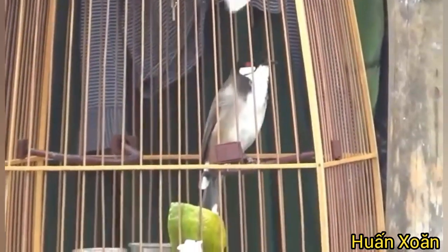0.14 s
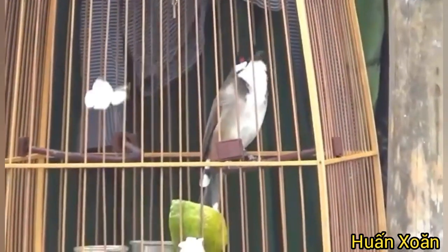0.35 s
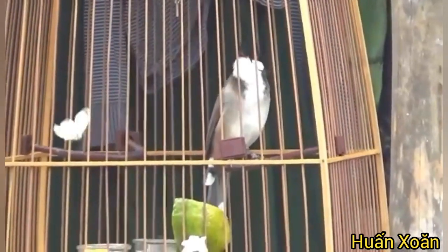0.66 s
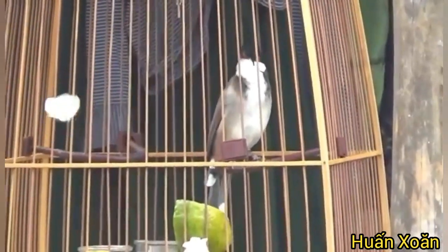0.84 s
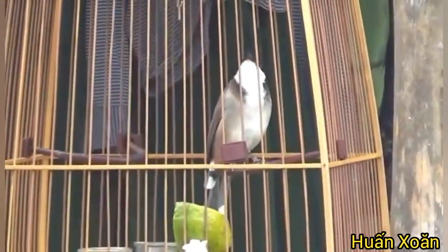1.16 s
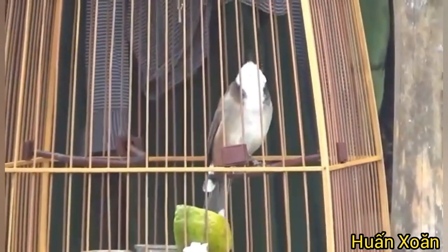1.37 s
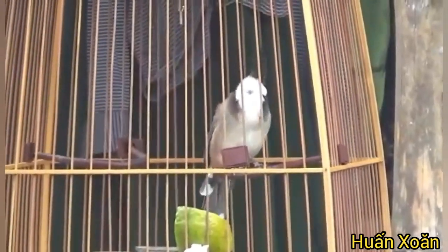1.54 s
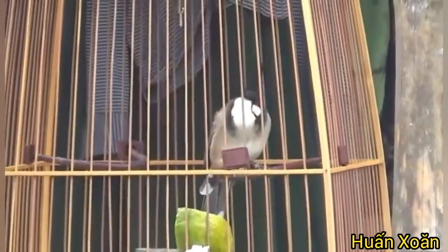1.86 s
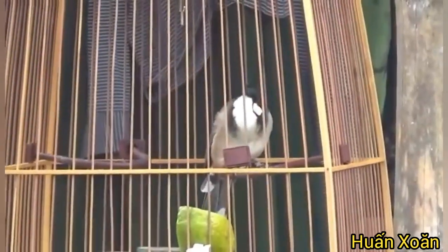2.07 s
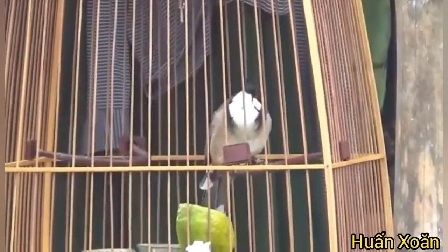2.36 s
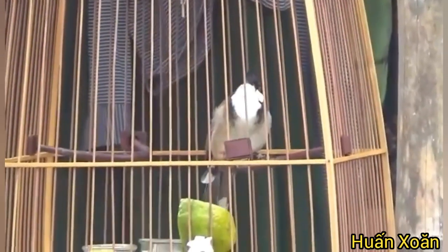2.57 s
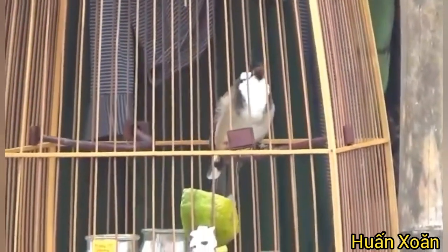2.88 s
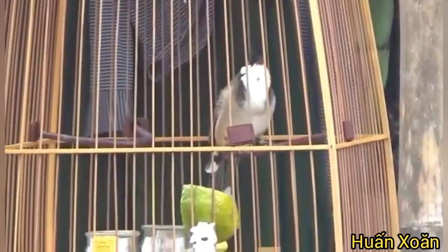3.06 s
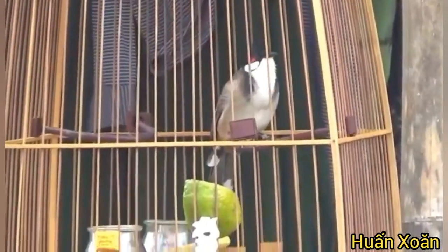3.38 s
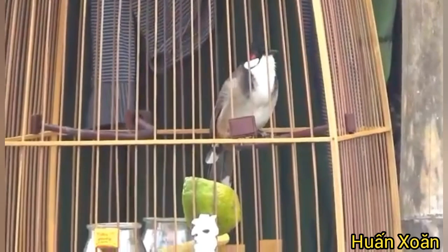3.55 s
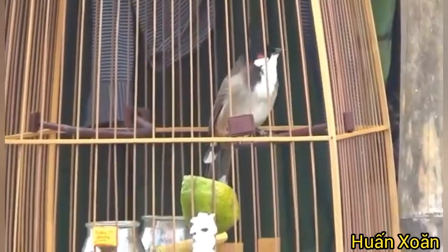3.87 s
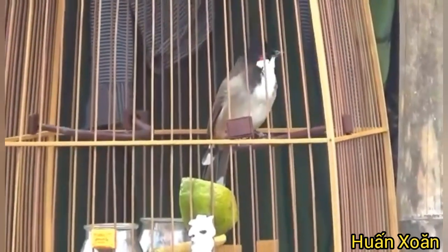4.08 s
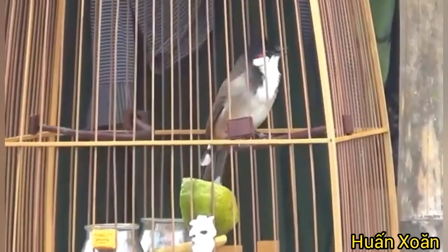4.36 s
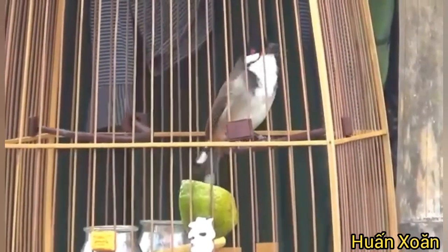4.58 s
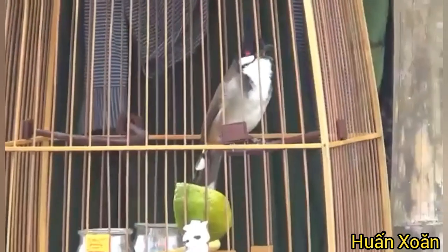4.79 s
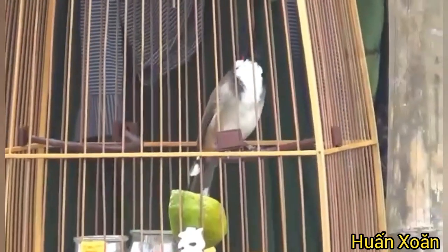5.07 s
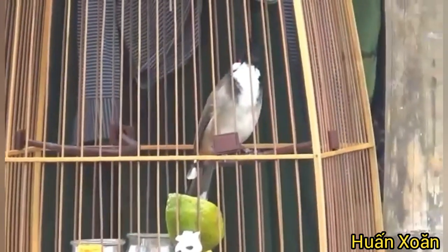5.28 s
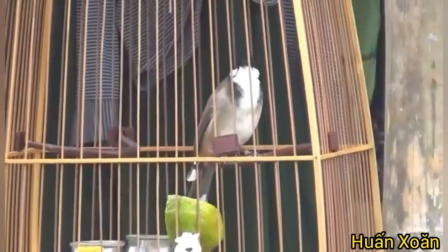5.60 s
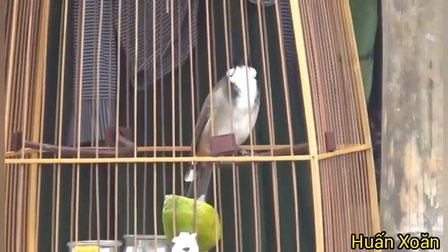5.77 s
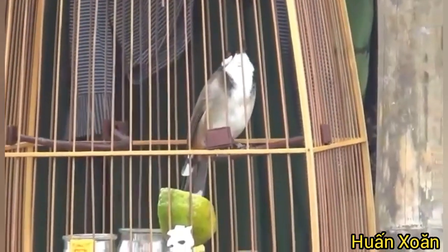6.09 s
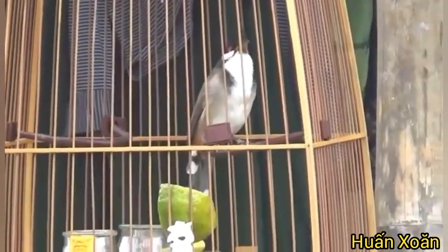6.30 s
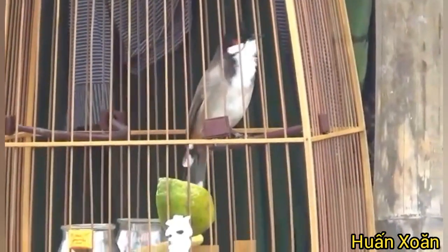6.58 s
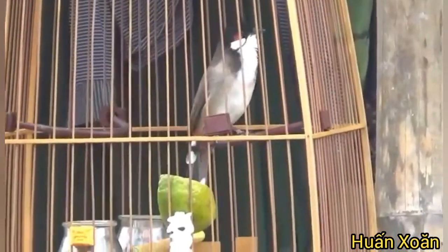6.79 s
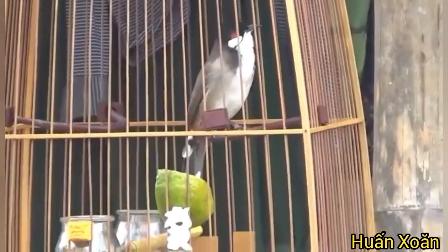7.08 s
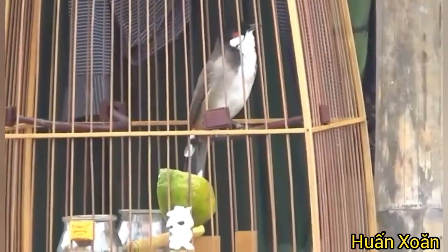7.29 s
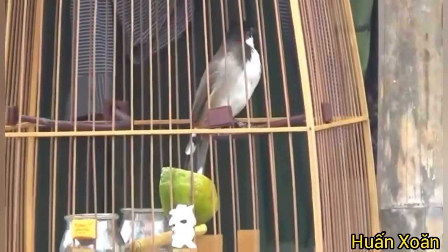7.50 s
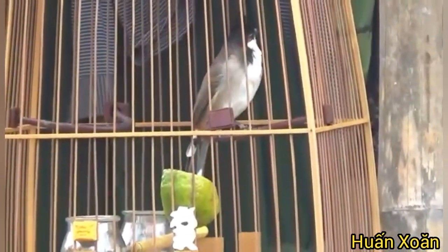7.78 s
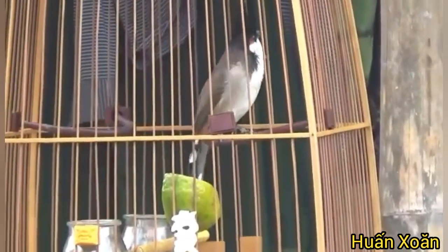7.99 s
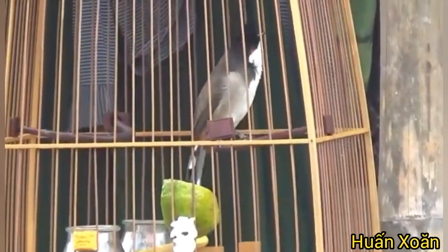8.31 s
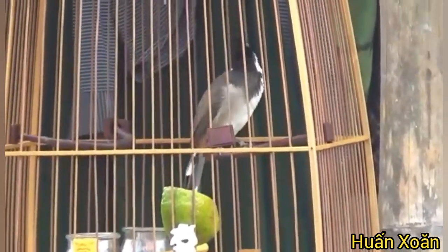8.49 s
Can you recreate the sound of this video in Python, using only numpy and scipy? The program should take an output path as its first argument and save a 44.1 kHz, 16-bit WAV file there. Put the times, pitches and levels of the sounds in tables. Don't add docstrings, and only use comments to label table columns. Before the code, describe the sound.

A caged songbird sings short bright whistled phrases with buzzy notes close by, while another bird whistles far to the right and a cricket pulses faintly.

```python
import sys
import numpy as np
from scipy import signal
from scipy.io import wavfile
from scipy.ndimage import uniform_filter1d, minimum_filter1d

SR = 44100
rng = np.random.default_rng(int(sys.argv[2]) if len(sys.argv) > 2 else 0)


def generate_wav(signal):
    frames = np.transpose(np.atleast_2d(signal))
    scaled = np.clip(frames, -1, 1) * 32767
    pcm = np.round(scaled).astype(np.int16)
    wavfile.write(sys.argv[1], SR, pcm)


def level_to_linear(level):
    exponent = np.asarray(level, float) / 20
    return 10 ** exponent


N = 381465


def unit_rms(x):
    return x / np.sqrt(np.mean(x ** 2) + 1e-20)


def read_curve(points, hz):
    f, value = np.transpose(points)
    return np.interp(np.log(hz + 1), np.log(f + 1), value)


def add(mix, start_s, sound):
    start = round(start_s * SR)
    part = mix[max(start, 0):][:len(sound) + min(start, 0)]
    part += sound[max(-start, 0):][:len(part)]


def drift(length, hz):
    width = int(SR / hz)
    chance = rng.standard_normal(max(length, 4096))[:length]
    return unit_rms(uniform_filter1d(uniform_filter1d(chance, width), width))


def phase(hz):
    return 2 * np.pi * np.cumsum(hz) / SR


def soft_edges(t, rise_s):
    to_edge_s = np.minimum(t - t[0], t[-1] - t)
    return np.sin(np.pi / 2 * np.clip(to_edge_s / rise_s, 0, 1))


# f/Hz, level/dB per Hz
AIR_SPECTRUM = [(20, 4), (64, -11), (98, -.6), (306, -3.5), (800, -5), (2100, -11), (7140, -18.5),
                (11200, -20.5)]
AIR_LEVEL_DB = -64
# f/Hz, likeness [0..1]
LIKENESS = [(60, 0.86), (140, 0.91), (340, 0.47), (820, 0.06), (1960, 0.07), (4690, 0.37), (11200, 0.85)]


def air():
    frames, hz = N // 256 + 5, np.fft.rfftfreq(1024, 1 / SR)
    a, b, c, d, patches = rng.standard_normal((frames, 513, 5)).T
    patches = unit_rms(uniform_filter1d(uniform_filter1d(patches, 12, 0), 14, 1))
    specks = rng.standard_normal((frames, 513)).T
    specks = unit_rms(uniform_filter1d(uniform_filter1d(specks, 4, 0), 4, 1))
    same = np.clip(read_curve(LIKENESS, hz), -1, 1)[:, None]
    left = a + 1j * b
    right = same * left + np.sqrt(1 - same ** 2) * (c + 1j * d)
    speck_db = 3.14 * specks * np.minimum(hz / 3000, 1)[:, None]
    level_db = read_curve(AIR_SPECTRUM, hz)[:, None] + 1.6 * patches + speck_db
    z = np.array([left, right]) * level_to_linear(level_db)
    wash = signal.istft(z, nperseg=1024, noverlap=768)[1][:, :N]
    low_cut = signal.butter(2, 38, "high", fs=SR, output="sos")
    return level_to_linear(AIR_LEVEL_DB + 2.5) * unit_rms(signal.sosfilt(low_cut, wash))


# t/s, firing f/Hz, level/dB
ENGINE_COURSE = [(0, 26, -76), (.5, 27.7, -66), (1.62, 27.9, -65), (1.8, 27.2, -75), (3.6, 26, -78),
                 (5.2, 26.3, -76), (6.5, 26, -82), (8.65, 26.5, -85)]
ORDER_LEVELS_DB = [-6, -2, -11, -14]
# centre t/s, half length/s, level/dB
ENGINE_LOADS = [(1.5, .25, -72), (2.95, .25, -73), (4.5, .3, -74)]


def engine():
    s, hz, db = np.transpose(ENGINE_COURSE)
    t = np.arange(N) / SR
    turn = phase(np.interp(t, s, hz))
    level_db = np.interp(t, s, db)
    hum = np.zeros(N)
    for k, own_db in enumerate(ORDER_LEVELS_DB, 2):
        hum += level_to_linear(level_db + own_db + 2.5 * drift(N, 9)) * np.sin(k * turn + k)
    load = sum(level_to_linear(db - 6 * ((t - at) / half_s) ** 2) for at, half_s, db in ENGINE_LOADS)
    return np.sqrt(2) * (hum + load * np.sin(5 * turn + 5))


# f/Hz, t60/s
YARD_T60 = [(1500, 0.48), (3000, 0.44), (6000, 0.2), (10000, 0.22)]


def yard(x, onset_s=.012):
    taps = np.zeros((2, SR // 2))
    at = np.arange(int(onset_s * SR), SR // 2 - 22, 22)
    at = at + rng.integers(0, 22, (2, len(at)))
    np.put_along_axis(taps, at, rng.choice([-1., 1.], at.shape), 1)
    hz, t, z = signal.stft(taps, SR, nperseg=256)
    decay = level_to_linear(-60 * t / read_curve(YARD_T60, hz)[:, None])
    tail = signal.istft(z * decay, SR, nperseg=256)[1]
    tail = tail + .5 * tail[::-1]
    return signal.oaconvolve(x[None], tail / np.linalg.norm(tail[0]), axes=1)[:, :N]


# delay/s, left level/dB, right level/dB
REFLECTIONS = [(.0014, -22, -23), (.0028, -21, -21), (.0061, -15, -9), (.011, -16.5, -16),
               (.0167, -14, -16.5), (.022, -25, -26), (.034, -24, -21.5)]


def echoes(x, aside=0.25):
    out = x + aside * np.gradient(x) * np.array([[1], [-1]])
    for delay_s, *db in REFLECTIONS:
        out += level_to_linear(np.array(db))[:, None] * np.roll(x, round(delay_s * SR))
    return out


# start t/s, end t/s, first level/dB, last level/dB
CRICKET_SWELLS = [(.2, 0.845, -86, -70.5), (1.49, 2.322, -83, -74), (3.103, 3.96, -84, -75),
                  (4.9, 5.55, -89, -74), (6.4, 7.057, -83, -74), (7.9, 8.544, -82, -76)]


def cricket(hz=7050, width_hz=500, strokes_hz=163.4):
    t = np.arange(N) / SR
    level = np.zeros(N)
    for start, end, first_db, last_db in CRICKET_SWELLS:
        level += level_to_linear(np.interp(t, [start, end], [first_db, last_db])) * (t > start) * (t < end)
    strokes = np.diff(np.floor(t * strokes_hz), prepend=0) * level_to_linear(2 * rng.standard_normal(N))
    short = t[:400]
    ring = np.exp(-np.pi * width_hz * short) * np.sin(2 * np.pi * hz * short)
    buzz = unit_rms(signal.oaconvolve(strokes, ring)[:N]) * uniform_filter1d(level, 400)
    return buzz * level_to_linear(np.array([[-1.5], [1.5]])) + level_to_linear(-10) * yard(buzz)


# t after onset/s, f/Hz, level/dB
CALL = [(0, 2940, 0), (.005, 3600, 2.5), (.03, 3740, 3), (.055, 4070, -11.5), (.08, 3920, -11)]


def answer(s, db, key):
    at, hz, shape_db = np.transpose(CALL)
    t = np.arange(0, at[-1], 1 / SR)
    pitch_hz = np.interp(t, at, hz) * key + 105 * drift(len(t), 203)
    level = level_to_linear(db - 9.5 + np.interp(t, at, shape_db))
    return s, level * soft_edges(t, 0.006) * np.sin(phase(pitch_hz))


# t/s, peak level/dB, pitch factor
FAR_CALLS = [(-.06, -41.5, 0.96), (.77, -37.5, .98), (1.81, -38, 1.0), (2.44, -39.5, 0.95),
             (3.341, -38, 1.03), (4.083, -40.5, 1.05), (4.86, -40.5, 1.04), (5.535, -42, 1.05),
             (6.44, -42, .97), (6.722, -40.5, 1.04), (7.549, -42, 1.055), (8.3, -38.5, 1.01)]


def far_bird():
    far = np.zeros(N)
    for row in FAR_CALLS:
        add(far, *answer(*row))
    return (level_to_linear(-5) * echoes(far) + level_to_linear(-2.5) * yard(far)) * level_to_linear(np.array([[-2.5], [2.5]]))


# f/Hz, level/dB
SECOND_OVERTONE = [(4000, -38), (5700, -46), (6500, -35), (7200, -31), (8000, -25), (9000, -25)]
THIRD_OVERTONE = [(5500, -56), (7500, -30.5), (8400, -27), (9200, -19.5), (10400, -13.5), (11500, -9.5)]


def note(rows, warble_hz=150, depth=0.0051, throb=4, rasp=0.36, ramp=.6, split=0):
    s, *columns = np.transpose(rows)
    t = np.arange(s[0] - .002, s[-1] + 0.0027, 1 / SR)
    n = len(t)
    hz, db = (np.interp(t, s, c) for c in columns)
    beat = phase(warble_hz * (1 + .03 * drift(n, 60))) - 1.2
    shake = np.sin(beat) + 0.49 * np.cos(2 * beat)
    hz = hz * (1 + depth * shake + (0.005 + 0.035 * depth) * drift(n, 245))
    turn = phase(hz)
    tone = np.sin(turn)
    tone += level_to_linear(read_curve(SECOND_OVERTONE, 2 * hz)) * np.sin(2 * turn)
    tone += level_to_linear(read_curve(THIRD_OVERTONE, 3 * hz)) * np.sin(3 * turn)
    tone += level_to_linear(read_curve(THIRD_OVERTONE, 4 * hz) - 14.5) * np.sin(4 * turn)
    tone += split * (np.sin(turn - 2 * beat) + .95 * np.sin(turn - beat - .6))
    for k, curve in (2, SECOND_OVERTONE), (3, THIRD_OVERTONE):
        smeared = np.sin(k * turn + 1.3 * k * np.sin(beat) + drift(n, 900))
        tone += 2.1 * split * level_to_linear(read_curve(curve, k * hz)) * smeared
    tone += rasp * depth * np.diff(rng.standard_normal(4096))[:n]
    pulse = shake + ramp * (.6 * np.sin(2 * beat) - np.cos(beat))
    strength = level_to_linear(db + 0.66 * drift(n, 180)) * (1 + min(throb * depth, .6) * pulse)
    return t[0], np.sqrt(2) * strength * soft_edges(t, .003) * tone


def course(s, length_s, from_hz, to_hz, db, peak=.5, first_db=-8, last_db=-10, bend=1.2):
    u = np.linspace(0, 1, 24)
    rise_db = first_db * (1 - u / peak) ** 2
    fall_db = last_db * ((u - peak) / (1 - peak)) ** 2
    hz = to_hz + (from_hz - to_hz) * (1 - u) ** bend
    return np.transpose([s + length_s * u, hz, db + np.where(u < peak, rise_db, fall_db)])


# t/s, length/s, level/dB
FREE_SLIDE = (1.277, .0116, -58)
SLIDE_LEAD_S, SLIDE_S, SLIDE_DB = .013, .016, -54


def slide(s, length_s, db, from_hz=1200, to_hz=2100):
    t = np.arange(0, length_s, 1 / SR)
    handover = t / length_s
    turn = phase((from_hz + (to_hz - from_hz) * handover) * (1 + .04 * drift(len(t), 500)))
    tone = level_to_linear(-26 + 28 * handover) * np.sin(turn) + level_to_linear(-8 * handover ** 2) * np.sin(2 * turn)
    return s, np.sqrt(2) * level_to_linear(db + 3 * drift(len(t), 400)) * soft_edges(t, .004) * tone


# t/s, length/s, top f/Hz, level/dB
FLICK_NOTES = [(.388, .008, 3200, -43), (1.557, .014, 3180, -38), (1.714, .012, 3340, -41),
               (2.902, .013, 2900, -39), (4.873, .013, 2930, -40), (6.062, .008, 3200, -42),
               (6.658, .011, 3240, -45), (6.671, .013, 3450, -41), (6.684, .011, 3090, -46),
               (6.815, .013, 2900, -42), (7.964, .008, 3200, -45), (8.17, .012, 2870, -51)]


def flicks(near):
    for s, length_s, top_hz, db in FLICK_NOTES:
        start = (s, .72 * top_hz, db - 8)
        top = (s + .45 * length_s, top_hz, db)
        end = (s + length_s, .82 * top_hz, db - 3)
        add(near, *note([start, top, end]))


# t/s, length/s, from f/Hz, to f/Hz, level/dB
GLIDE_NOTES = [(.59, .008, 2200, 3150, -51), (.604, .029, 3800, 3590, -42), (1.288, .007, 2400, 3300, -44),
               (1.295, .016, 3300, 3460, -28.5), (1.311, .021, 3000, 3480, -33),
               (1.344, .017, 3050, 2350, -43), (2.915, .011, 2350, 3150, -41),
               (2.995, .039, 3640, 3400, -29), (3.053, .06, 2420, 2570, -37), (4.886, .01, 2300, 3100, -41),
               (4.964, .035, 3640, 3400, -30), (5.02, .06, 2430, 2580, -39.5),
               (6.373, .011, 2400, 3800, -50), (6.385, .028, 3470, 3370, -34.5),
               (6.421, .011, 3280, 3200, -43), (6.434, .034, 3100, 2760, -33),
               (6.735, .03, 2120, 1960, -40.5), (6.765, .025, 1520, 1570, -50),
               (8.183, .026, 3950, 3600, -53)]
HOLD_NOTES = [(2.925, .061, 3040, 2720, -31.5), (4.894, .065, 3040, 2730, -34.5)]
LANDING_NOTES = [(.632, .051, 3420, 3090, -35), (8.208, .058, 3550, 3170, -37)]


def pure_notes(near):
    for row in GLIDE_NOTES:
        add(near, *note(course(*row, peak=.45, first_db=-6, last_db=-9, bend=2.3)))
    for row in HOLD_NOTES:
        add(near, *note(course(*row, peak=.85, first_db=-11, last_db=-5, bend=.55), 150, .012))
    for row in LANDING_NOTES:
        add(near, *note(course(*row, peak=.55, first_db=-2.5, last_db=-10, bend=7.5), 150, .012))


# t/s, length/s, from f/Hz, to f/Hz, level/dB
BURR_NOTES = [(1.508, .047, 2040, 2450, -44), (1.666, .045, 2000, 2460, -44), (6.536, .06, 1900, 2230, -45),
              (6.79, .025, 1950, 2020, -43)]
RASP_NOTES = [(.698, .025, 2400, 2420, -45), (3.115, .028, 2260, 2230, -43), (5.082, .028, 2290, 2260, -45),
              (8.277, .027, 2450, 2450, -43)]


def harsh_notes(near):
    for row in BURR_NOTES:
        add(near, *note(course(*row, peak=.45, first_db=-8, last_db=-5, bend=.8), 105, .062))
    for row in RASP_NOTES:
        add(near, *note(course(*row, peak=.4, first_db=-1.5, last_db=-5), 125, .055, rasp=.8))


# t/s, length/s, top f/Hz, level/dB, shake f/Hz
BUZZ_NOTES = [(2.493, .057, 3480, -35, 180), (2.716, .066, 3490, -31.5, 186),
              (4.489, .058, 3520, -34.5, 183.5), (4.683, .067, 3510, -32, 185)]


def buzzes(near):
    for s, length_s, hz, db, shake_hz in BUZZ_NOTES:
        path = course(s, length_s, .85 * hz, hz, db, peak=.62, first_db=-9, last_db=-6.5, bend=8.5)
        add(near, *note(path, shake_hz, .012, throb=12, rasp=2.8, ramp=-1.6, split=.46))
        add(near, *slide(s - SLIDE_LEAD_S, SLIDE_S, SLIDE_DB))


# t/s, length/s, top f/Hz, level/dB, shake f/Hz
SWEEP_NOTES = [(.397, .042, 4500, -37, 187), (6.07, .046, 4500, -35.5, 175), (7.971, .05, 4300, -39.5, 200)]
# t/s, length/s, from f/Hz, to f/Hz, level/dB
FREE_SWEEP = (6.239, .058, 2350, 3900, -35)


def sweeps(near):
    for s, length_s, hz, db, shake_hz in SWEEP_NOTES:
        path = course(s, length_s, .765 * hz, hz, db, peak=.25, first_db=-5, last_db=-19, bend=1.35)
        add(near, *note(path, shake_hz, .035, split=.33))
        add(near, *slide(s - SLIDE_LEAD_S - .006, SLIDE_S, SLIDE_DB - 1.5))
    path = course(*FREE_SWEEP, peak=.42, first_db=-17, last_db=-15, bend=1.5)
    add(near, *note(path, 196, .03, split=.33))


def songbird():
    near = np.zeros(N)
    for sing in flicks, pure_notes, harsh_notes, buzzes, sweeps:
        sing(near)
    add(near, *slide(*FREE_SLIDE))
    return echoes(near) + level_to_linear(-15) * yard(near)


def scene():
    return air() + engine() + cricket() + far_bird() + songbird()


def masked(x, below_db=35, cut_db=30, reach=28):
    z = signal.stft(x, nperseg=1024, noverlap=768)[2]
    power = uniform_filter1d((abs(z) ** 2).mean(0), size=8, axis=0)
    power_db = 10 * np.log10(abs(power) + 1e-20)
    loud_db = np.roll(-minimum_filter1d(-power_db, reach, axis=0), reach // 2, axis=0)
    luck = np.repeat(rng.standard_normal((65, z.shape[2])), 8, axis=0)[:513]
    drop = np.clip((loud_db - power_db - below_db + 3 * luck) / 3, 0, 1)
    return signal.istft(z * level_to_linear(-cut_db * drop), nperseg=1024, noverlap=768)[1][:, :N]


def roll_off(x):
    return signal.sosfilt(signal.butter(12, 11810, fs=SR, output="sos"), x)


def record(dry):
    limit = signal.firwin(255, 11070, window=("kaiser", 9), fs=SR)
    mix = masked(signal.oaconvolve(dry, limit[None], "same"))
    return roll_off(mix)


dry = scene()
out = record(dry)
generate_wav(out)
```